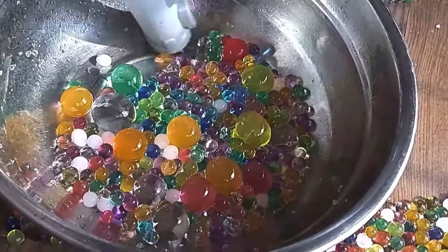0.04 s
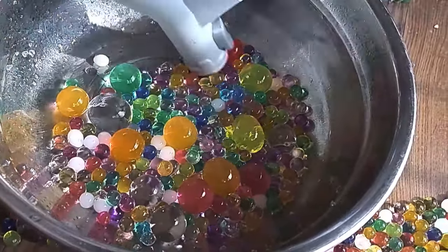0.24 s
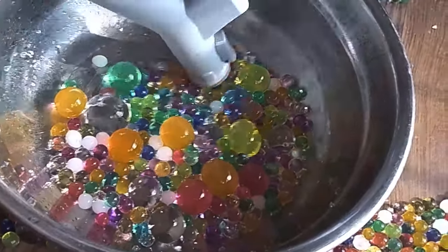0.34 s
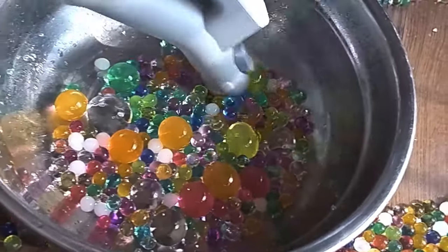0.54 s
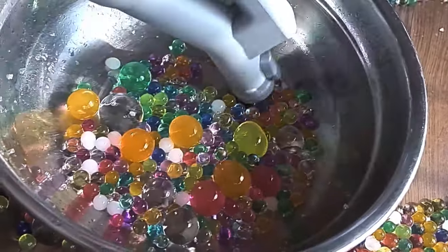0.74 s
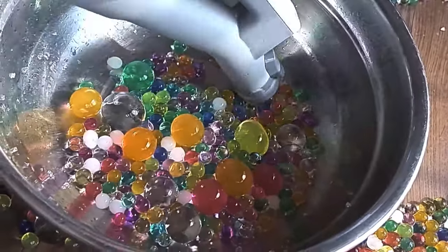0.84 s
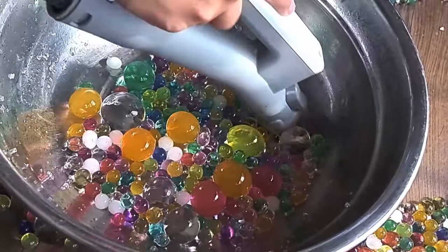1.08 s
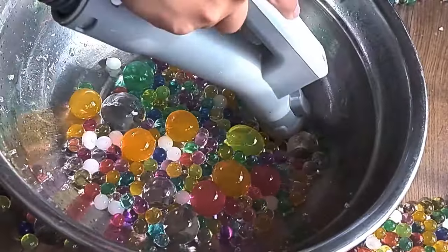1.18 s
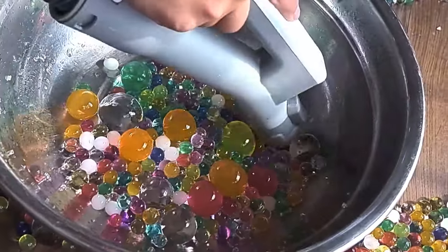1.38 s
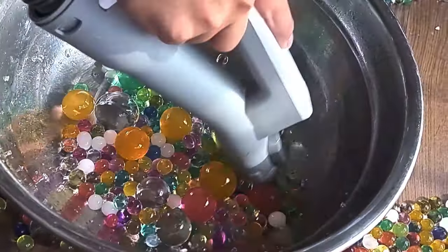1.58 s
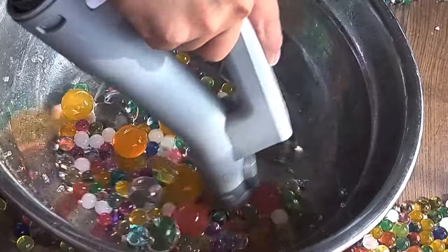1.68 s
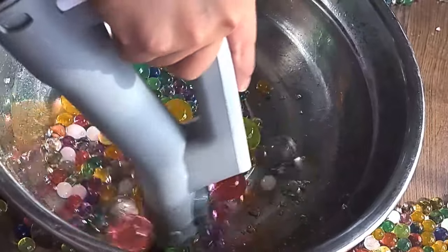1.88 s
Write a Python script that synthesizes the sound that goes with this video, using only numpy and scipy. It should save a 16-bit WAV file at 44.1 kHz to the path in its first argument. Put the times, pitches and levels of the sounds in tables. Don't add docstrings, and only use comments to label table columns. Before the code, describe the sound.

Handheld vacuum sucking water beads from a steel bowl, thudding and clattering over a steady whine

```python
import sys
import numpy as np
from scipy import signal
from scipy.fft import rfft, irfft
from scipy.io import wavfile
from scipy.ndimage import uniform_filter1d

SR = 44100
rng = np.random.default_rng(int(sys.argv[2]) if len(sys.argv) > 2 else 0)


def boost(x):
    u = np.asarray(x, float) / 20
    return 10 ** u


def bounce(signal):
    frames = np.transpose(np.atleast_2d(signal))
    limited = np.clip(frames, -1, 1)
    pcm = np.round(limited * 32767).astype(np.int16)
    wavfile.write(sys.argv[1], SR, pcm)


N = 83790

# start_s, blade_tone_hz
FAN_SPEED = [(0, 10682), (.3, 10665), (.52, 10735), (.76, 10765), (.88, 10795), (1.12, 10780),
             (1.35, 10728), (1.9, 10675)]
# start_s, whine_db, whine_left_right_db, whine_lag_rad, blade_tone_db
MOTOR_TONES = [(0, -32.5, 6, 2.7, -59), (.05, -30, 5, 2.7, -69), (.09, -47, 9.5, 2.7, -63),
               (.15, -33.5, 6, 2.5, -67), (.32, -36.5, 16.5, 3.1, -60), (.39, -34, 16.5, 3.4, -64),
               (.486, -36, 0, 2.2, -53), (.71, -35.5, 24, 1.8, -54.5), (.82, -39.5, 17, 2.6, -62),
               (.9, -39.5, 18.5, 2.3, -60), (1.03, -28, 2, 2.85, -55), (1.09, -28, 7, 2.5, -53),
               (1.15, -36, 4, 2.6, -51), (1.2, -30.5, 7.5, 2.44, -58.5), (1.5, -30, 4, 2.8, -58),
               (1.61, -27, 8, 3, -62), (1.81, -33.5, 8, 2.7, -58), (1.9, -34.5, 10, 2.5, -55)]
# multiple_of_shaft_speed, level_db
SHAFT_ORDERS = [(1, -52), (2, -54), (3.28, -60), (4.41, -64), (21.15, -58), (23, -57), (24.5, -56)]
# centre_s, width_s, multiple_of_shaft_speed, level_db
WHISTLES = [
    (0.595, 0.15, 9, -55),
    (1.24, 0.71, 1.0, -49),
    (0.98, 0.094, 3.345, -37.5),
    (0.53, 0.17, 3.35, -51),
    (1.606, 0.11, 3.28, -44.5),
    (0.054, 0.13, 3.36, -54),
    (0.82, .15, 4.41, -55.5),
    (1.15, 0.51, 4.41, -62.5),
    (.4, .08, 7.12, -58.5),
]
# start_s, hiss_db
SUCTION = [(0, -46), (.5, -45), (.69, -40.5), (.8, -38), (.9, -41), (1.2, -42.5), (1.9, -44)]
# pitch_hz, level_db (per Hz)
RUSH_COLOUR = [(24, -24), (40, 10.5), (452, -5.5), (593, -6.5), (1640, -17), (2150, -1.5), (2300, -108),
               (2990, -67), (5060, -120)]
THROAT_COLOUR = [(1350, -21), (2300, -3), (2500, -4.5), (2700, 1.5), (3420, -8), (5790, -9.5),
                 (6770, -13.5), (8000, -22.5), (10400, -79), (17600, -120)]
FAN_COLOUR = [(4710, -53.5), (8000, -26.5), (10200, -16.5), (10400, -13), (11300, -10), (12200, -6),
              (13800, 0.5), (15400, 2.5)]
# start_s, patter_db, nozzle_left_right_db
TRAFFIC = [(0, -37.5, 1.5), (.22, -33, 2.5), (.25, -35, 9.5), (.6, -25.5, 9), (.85, -26, 14.5),
           (1.0, -26, 3), (1.1, -29, 3), (1.2, -36, 5.5), (1.9, -38, 6.5)]
# pitch_hz, width_hz, level_db
TUBE = [(69.4, 25, 5), (149.6, 49.4, 0.5), (195, 56, -2.5), (270, 70, -3), (390, 83, -8),
        (529.7, 34.5, -9.5), (780, 133, -5.5), (998, 72, -9.5), (1143, 130, -9), (1690, 1200, -16),
        (2047, 200, -13.5)]
# centre_s, level_db, pitch_hz
KNOCKS = [(0.163, -28, 794), (0.194, -27.5, 880), (0.237, -23.5, 950), (0.27, -34, 720), (0.329, -30, 865),
          (0.439, -25.5, 592), (0.441, -20.5, 840), (0.473, -20, 835), (0.488, -28, 850), (0.56, -21, 780),
          (0.579, -21, 940), (0.594, -23.5, 710), (0.623, -21, 800), (0.623, -19, 531),
          (0.624, -18.5, 1017), (0.71, -21.5, 810), (0.743, -16.6, 797), (0.776, -21.5, 790),
          (0.784, -22, 1065), (0.795, -18.5, 868), (0.836, -21, 780), (0.845, -29, 980), (0.856, -29, 1290),
          (0.861, -30, 684), (0.925, -22.5, 792), (1.082, -16, 770), (1.089, -19.5, 422),
          (1.099, -30.5, 430), (1.101, -16, 825), (1.856, -34, 816)]
# centre_s, level_db, pitch_hz
MORE_KNOCKS = [(.165, -30, 1030), (.25, -28, 1040), (.315, -40, 830), (.345, -33, 820), (.38, -31, 411),
               (.4, -30, 840), (.54, -26, 790), (.722, -23, 1280), (.726, -24, 1520), (.73, -24, 820),
               (.777, -24, 1160), (.81, -23, 680), (.86, -25, 830), (.88, -31, 786), (.918, -19.5, 804),
               (1.0, -28.5, 810), (1.095, -23, 1200), (1.095, -19, 528), (1.12, -26, 532), (1.12, -27, 803)]
# centre_s, level_db, pitch_hz
GULPS = [(0.236, -18, 238), (0.27, -18, 79.2), (0.273, -19, 224.0), (0.309, -27, 129.0),
         (0.329, -12.5, 134), (0.347, -16, 148.0), (0.387, -17, 79.5), (0.406, -20.5, 211),
         (0.441, -12.5, 230), (0.451, -14, 120), (0.469, -16.5, 242), (0.5, -19.5, 79),
         (0.559, -18.5, 195.0), (0.573, -13.5, 66.4), (0.579, -46, 420), (0.581, -12.5, 153),
         (0.589, -18.5, 430), (0.624, -11.5, 222), (0.634, -15, 86), (0.635, -29, 276.0),
         (0.651, -50, 138.0),
         (0.715, -22.5, 138), (0.748, -37, 190), (0.746, -18.5, 78.6), (0.776, -15, 314),
                   (0.803, -11, 270), (0.816, -18.5, 173), (0.826, -28.5, 403), (0.834, -12, 164),
                   (0.839, -21, 413), (0.861, -12, 144), (0.877, -19, 67), (0.876, -14.5, 143),
                   (0.931, -32, 196), (0.957, -39, 154), (0.981, -28, 85.0), (1.09, -15, 227),
                   (1.106, -11.5, 90.4), (1.12, -26.5, 202), (1.131, -24, 213),
         (1.242, -25.5, 195),
    (1.262, -24.5, 230),
    (1.3, -26, 410),
    (1.304, -26.5, 166),
    (1.356, -26, 216),
    (1.492, -30, 78.5),
    (1.796, -27.5, 194),
    (1.866, -27, 204),
    (1.888, -29.5, 82),
]
# centre_s, level_db, pitch_hz
STUCK_BEADS = [
    (.165, -49, 77),
    (.797, -12, 264),
    (1.087, -3.5, 203),
    (1.15, -21.5, 190),
]
# centre_s, level_db, pitch_hz
MORE_GULPS = [
    (.26, -12.5, 74.5),
    (.325, -11.5, 89),
    (.36, -13, 71),
    (.49, -10.5, 72),
    (.54, -20, 70),
    (.58, -31, 60),
    (.775, -5.5, 324),
    (1.17, -25, 78.4),
    (1.27, -26, 82),
    (1.82, -31, 79),
]
# start_s, spray_db, throat_opening_db
SPRAY = [(0, -72, -4.5), (.18, -87, -7), (.25, -81, -0.5), (.36, -53, -2.5), (.44, -63, -3), (.48, -56, -2),
         (.6, -61, -2), (.66, -48.5, 0.5), (.76, -44, -3.5), (.8, -39.5, -1.5), (.87, -47, 0.5),
         (.92, -54, -1), (1.07, -65, 0), (1.4, -72, -1), (1.9, -65, -1)]
# pitch_hz, width_hz, level_db
NOZZLE = [(4144, 420, 0.5), (3560, 240, -4.5), (2770, 350, -0.5)]
# pitch_hz, share_of_faint_patches_muted
MUTED = [(2200, 0), (2500, .04), (3600, .15), (5000, .3), (7500, .75), (10000, .68), (12000, 0)]

SIDE = np.array([[.5], [-.5]])
PORT_LAG_S, BODY_LAG_S = 0.00032, 0.00018
UNLIKE_BODY, UNLIKE_AIR = 0.42, 0.88


def curves(rows):
    start_s, *columns = np.array(rows).T
    return [np.interp(np.arange(N) / SR, start_s, column) for column in columns]


def unit(x):
    return x / np.sqrt(np.mean(x ** 2))


def ring(x, hz, width):
    b, a = signal.iirpeak(hz, hz / width, fs=SR)
    return signal.lfilter(b, a, signal.lfilter(b, a, x))


def walk(rate):
    k = int(SR / rate)
    steps = np.repeat(rng.standard_normal(N // k + 1), k)
    return uniform_filter1d(uniform_filter1d(steps, k), k)[:N]


def ports(x, other, unlike, lag_s):
    pan_db, pan_bass_db, pan_turn_hz, bass_turn_rad = 9, 3, 295, 0.099
    hz = np.fft.rfftfreq(N, 1 / SR)
    treble = hz ** 2 / (hz ** 2 + pan_turn_hz ** 2)
    pan = boost((pan_bass_db + (pan_db - pan_bass_db) * treble) / 2)
    share = np.clip(unlike * np.minimum(hz / 1500.0, 1) + 0.055, 0, 1)
    left = rfft(x)
    late = left * np.exp(-2j * np.pi * hz * lag_s - 1j * bass_turn_rad * (1 - treble))
    right = np.sqrt(1 - share ** 2) * late + share * rfft(other)
    return irfft(np.array([left * pan, right / pan]), N)


def bursts(rows, cycles, sag):
    out = np.zeros(N + SR)
    for (s, db, hz), turn in zip(rows, rng.random(len(rows))):
        u = np.arange(int(4.5 * cycles * SR / hz)) * hz / SR / cycles
        shape = (u / 0.29) ** 2 * np.exp(2 * (1 - u / 0.3)) * (1 - (u / 5.7) ** 2) ** 2
        swing = np.sin(2 * np.pi * (turn + cycles * u * (1 + sag * (.8 - u))))
        start = int((s - 0.3656 * cycles / hz) * SR)
        out[start:start + len(u)] += boost(db) * shape * swing
    return out[:N]


def ticks(per_s, scatter_db):
    hit = rng.random(N) < per_s / SR
    return hit * boost(scatter_db * rng.exponential(size=N)) * rng.choice([-1, 1], N)


def hiss(colour, bands_per_octave=4):
    hz = np.fft.rfftfreq(N, 1 / SR) + 1
    colour_hz, colour_db = np.array(colour).T
    spec = rfft(rng.standard_normal(N)) * boost(np.interp(np.log(hz), np.log(colour_hz), colour_db))
    spec *= (hz >= colour_hz[0]) & (hz < colour_hz[-1])
    band = (np.log2(hz) * bands_per_octave).astype(int)
    out = np.zeros(N)
    for b in np.unique(band[abs(spec) > 0]):
        out += irfft(spec * (band == b), N) * boost(.9 * walk(22))
    return unit(out)


def motor():
    blades, whine_order = 18, 3.558
    blade_hz, = curves(FAN_SPEED)
    whine_db, whine_side_db, whine_lag_rad, blade_db = curves(MOTOR_TONES)
    shaft_hz = blade_hz / blades * (1 + 0.000087 * walk(25.))
    turn = 2 * np.pi * np.cumsum(shaft_hz) / SR

    def tone(order, db):
        return np.sqrt(2) * boost(db) * np.sin(order * turn)

    shaft = sum(tone(order, db + 1.5 - 2.5 * walk(15.0)) for order, db in SHAFT_ORDERS)
    for s, width, order, db in WHISTLES:
        shaft = shaft + tone(order, db) * np.exp(-((np.arange(N) / SR - s) / width) ** 2)
    blade = tone(blades, blade_db + 2.0 * walk(12.0) + 1.2)
    whine = boost(whine_db + SIDE * whine_side_db + walk(30.0) / 2)
    whine = whine * np.sin(whine_order * turn + SIDE * whine_lag_rad)
    return ports(shaft, shaft, 0, PORT_LAG_S) + whine + blade * boost(SIDE * 3)


def air():
    suction_db, = curves(SUCTION)
    traffic_db, _ = curves(TRAFFIC)
    _, throat_db = curves(SPRAY)
    rush = hiss(RUSH_COLOUR) * boost(-49.5 + 1.95 * (suction_db + 48))
    fan = hiss(FAN_COLOUR) * boost(suction_db + 0.5)
    throat_db = throat_db - 51.5 + 0.85 * (suction_db + 46) + 0.14 * (traffic_db + 47)
    return rush + fan + hiss(THROAT_COLOUR) * boost(throat_db)


def patter(gulps):
    splash_db, splash_s = -15.5, 0.025
    hits = ticks(2000, 1.5)
    tube = np.zeros(N)
    for k, (hz, width, db) in enumerate(TUBE):
        tube += (-1) ** k * boost(db) * unit(ring(hits, hz, 1.22 * width))
    smear = int(splash_s * SR)
    thrown = uniform_filter1d(uniform_filter1d(abs(gulps), smear), smear)
    traffic_db, _ = curves(TRAFFIC)
    return tube * (boost(traffic_db - 6 + 2.7 * walk(32.47)) + boost(splash_db) * thrown)


def bead_knocks():
    return boost(1) * bursts(KNOCKS, cycles=13.86, sag=0.067)


def gulp_thumps():
    quick = bursts(GULPS, cycles=2.95, sag=0.19)
    return boost(4) * quick + bursts(STUCK_BEADS, cycles=7.4, sag=0.04)


def more_knocks():
    return bursts(MORE_KNOCKS, cycles=16, sag=0.031)


def more_gulps():
    return bursts(MORE_GULPS, cycles=3, sag=.1)


def spray():
    hits = ticks(1300, 3.5)
    wall = sum(boost(db) * unit(ring(hits, hz, width)) for hz, width, db in NOZZLE)
    spray_db, _ = curves(SPRAY)
    return unit(wall) * boost(spray_db)


def scene():
    gulps, knocks = gulp_thumps(), bead_knocks()
    _, nozzle_side_db = curves(TRAFFIC)
    nozzle = boost(SIDE * (nozzle_side_db - 6.5))
    body = ports(gulps + knocks + patter(gulps), knocks + patter(gulps), UNLIKE_BODY, BODY_LAG_S)
    extra = more_gulps() + more_knocks()
    body = body + ports(extra, extra, 0, BODY_LAG_S)
    rush = ports(air(), air(), UNLIKE_AIR, PORT_LAG_S)
    drops = ports(spray(), spray(), UNLIKE_AIR, PORT_LAG_S)
    return body * nozzle + rush + drops + motor()


def mute_faint_patches(x):
    hz, _, patches = signal.stft(x, SR, nperseg=2048)
    level = uniform_filter1d(abs(patches).sum(axis=0), size=5, axis=0)
    level = uniform_filter1d(level, size=2, axis=1)
    level = level / np.exp(uniform_filter1d(np.log(level + 1e-12), size=40, axis=0))
    rank = level.ravel().argsort().argsort().reshape(level.shape) / level.size
    keep = rank >= np.interp(hz, *np.array(MUTED).T)[:, None]
    return signal.istft(patches * keep, SR, nperseg=2048)[1][:, :N]


def low_pass(x):
    return signal.sosfilt(signal.butter(12, 16520, fs=SR, output="sos"), x)


def record(dry):
    low_hz, ceiling, top_hz = 48, .93, 15500
    x = signal.sosfilt(signal.butter(2, low_hz, "high", fs=SR, output="sos"), dry)
    x = x / (1 + (abs(x) / ceiling) ** 4) ** .25
    x = signal.sosfilt(signal.ellip(8, .2, 70, top_hz, fs=SR, output="sos"), x)
    return low_pass(mute_faint_patches(x))


dry = scene()
out = record(dry)
bounce(out)
```